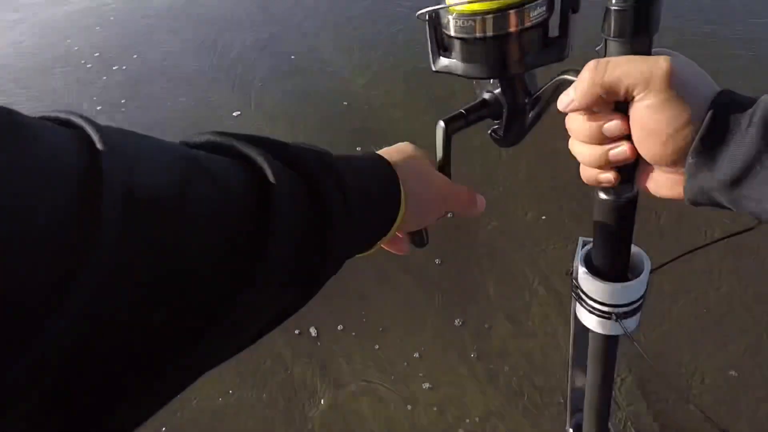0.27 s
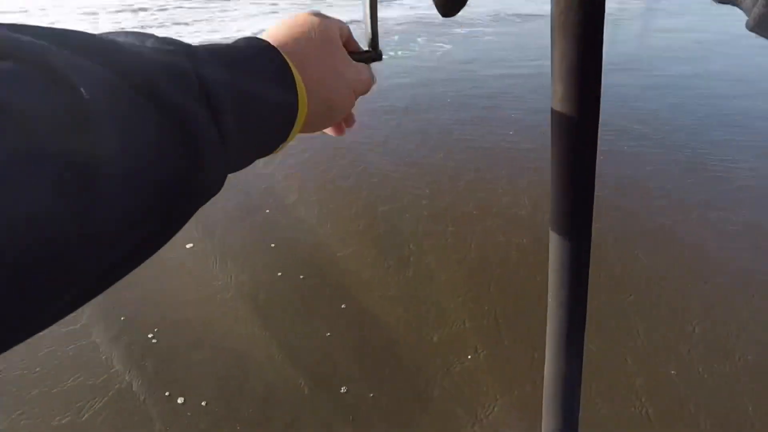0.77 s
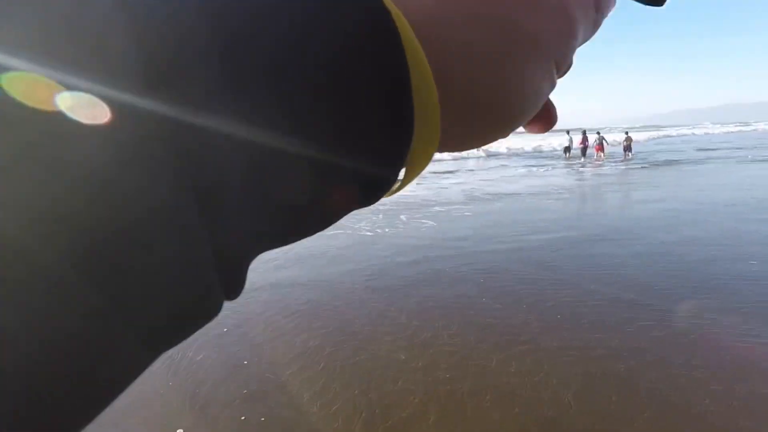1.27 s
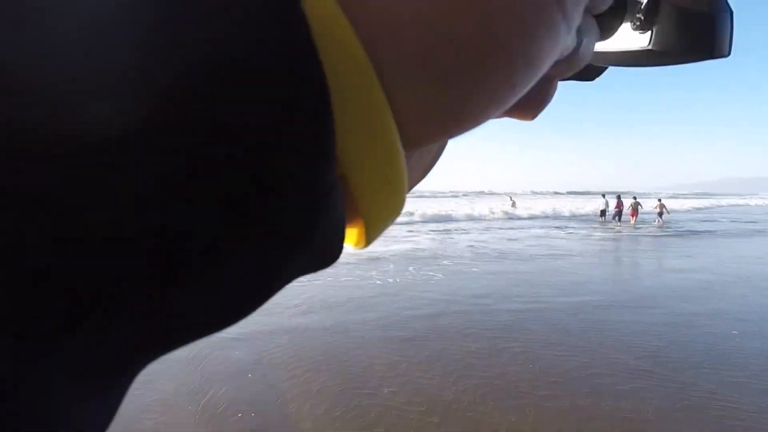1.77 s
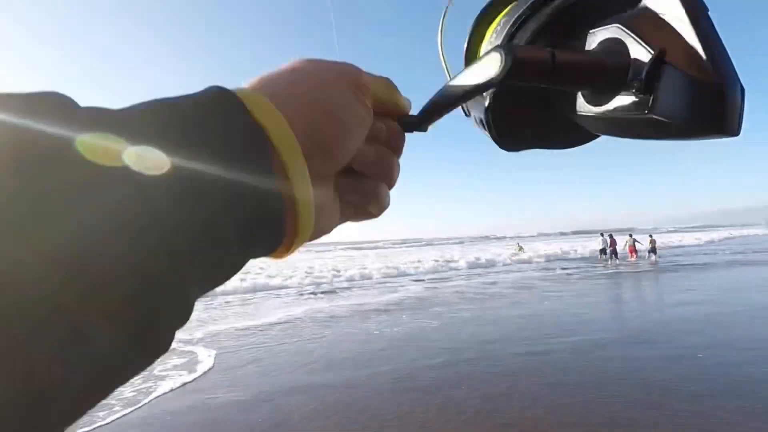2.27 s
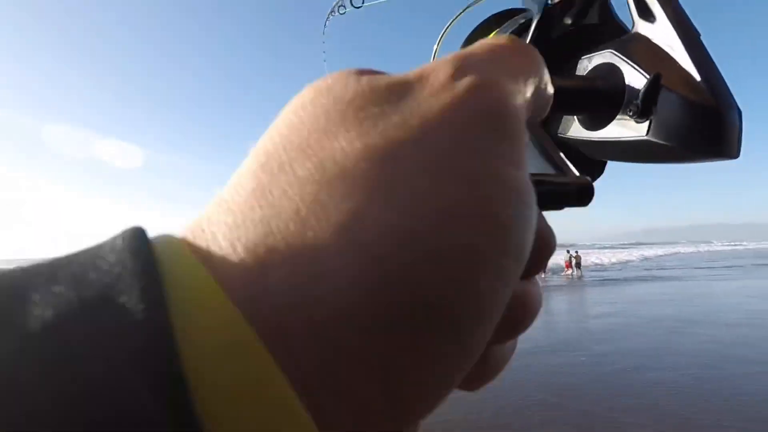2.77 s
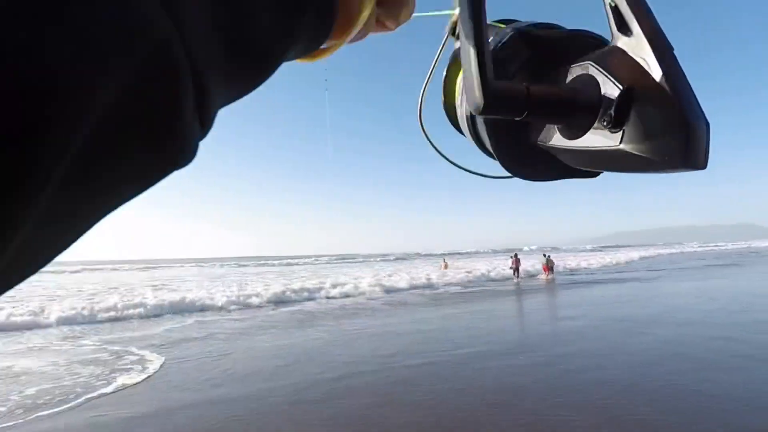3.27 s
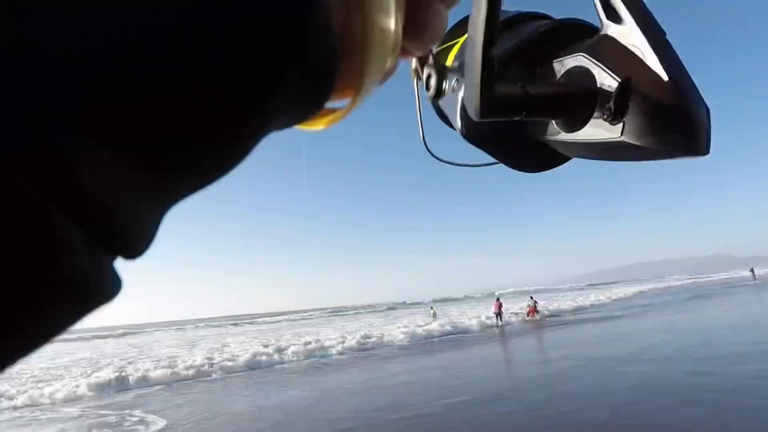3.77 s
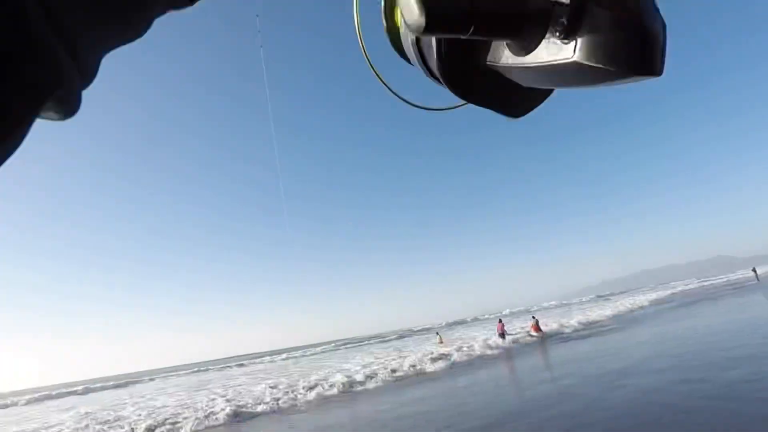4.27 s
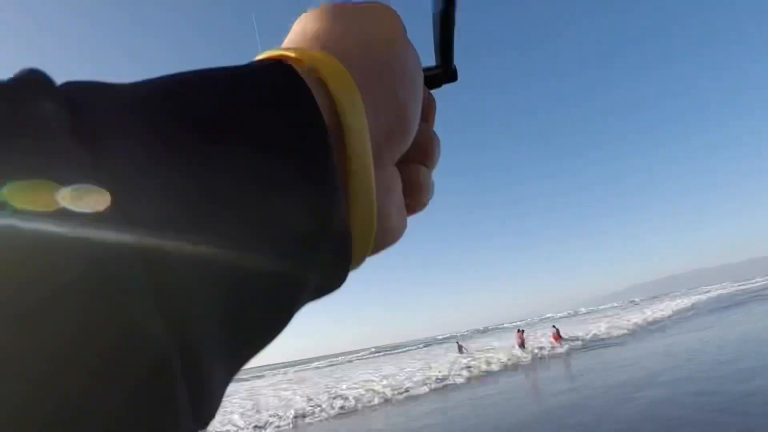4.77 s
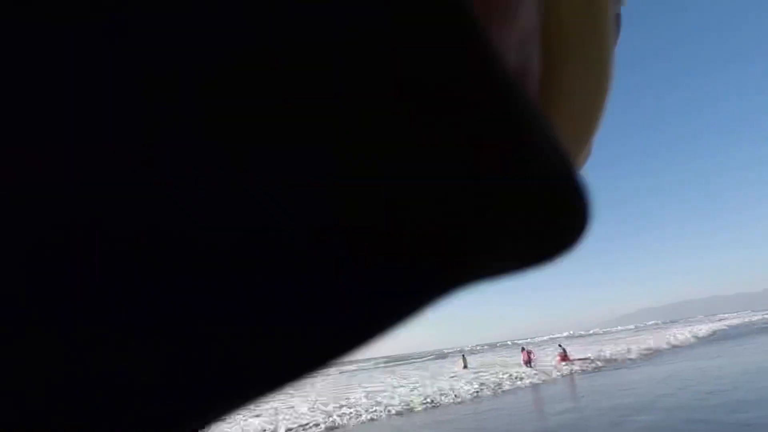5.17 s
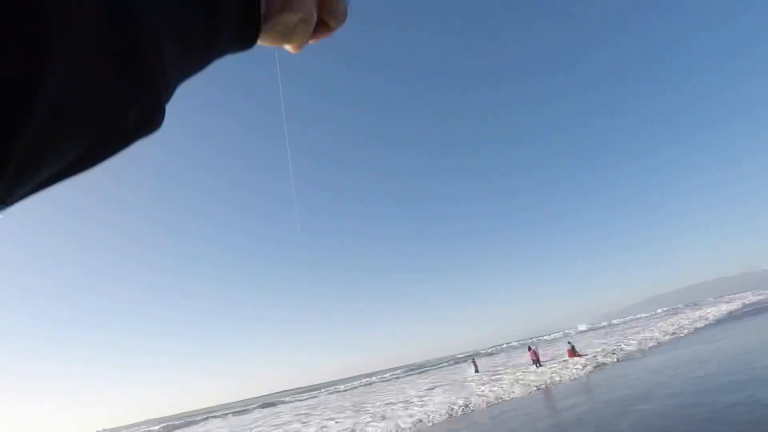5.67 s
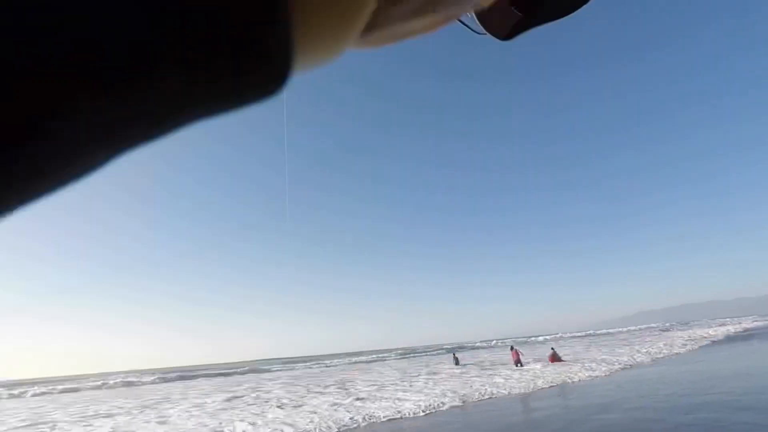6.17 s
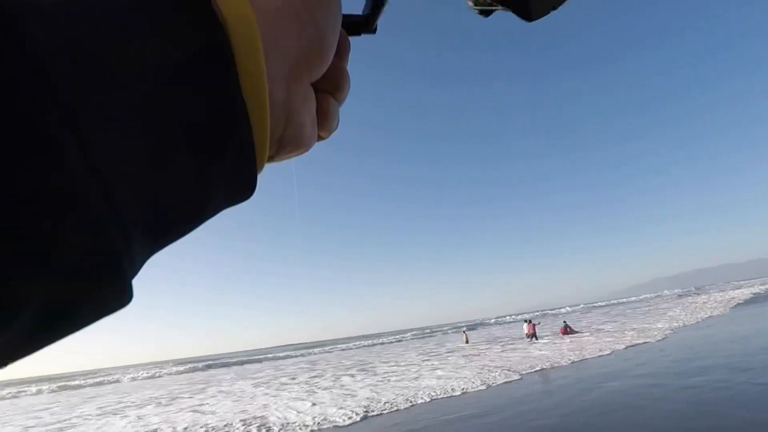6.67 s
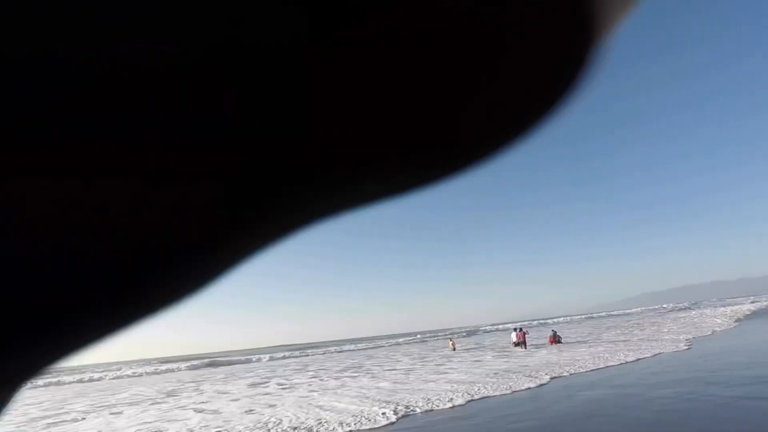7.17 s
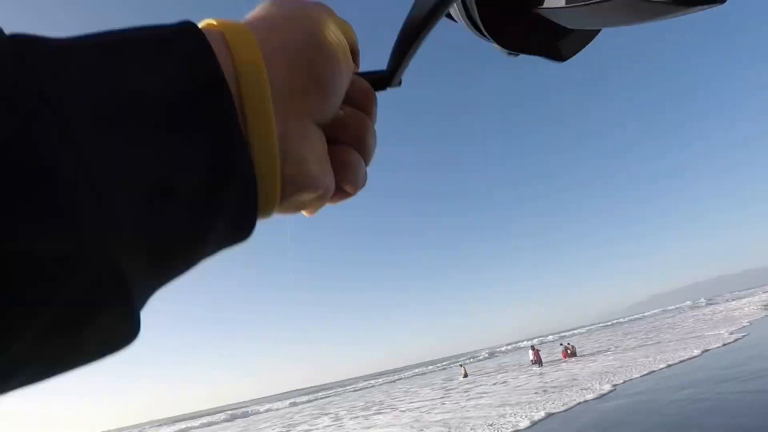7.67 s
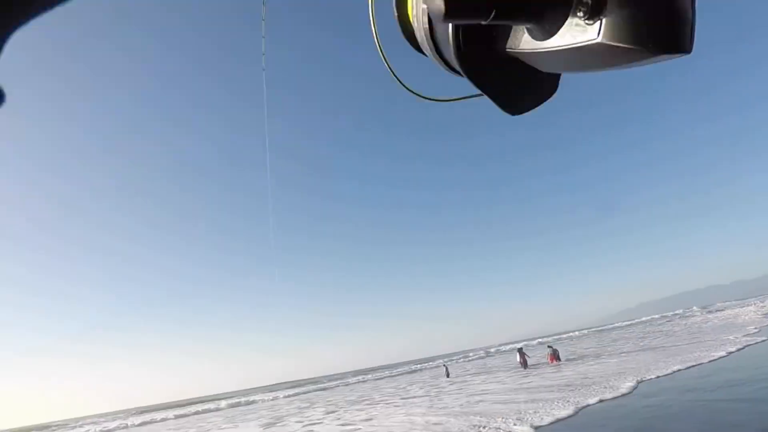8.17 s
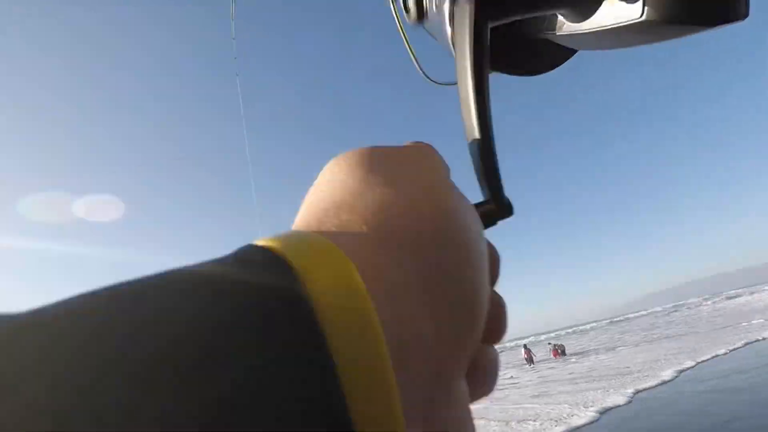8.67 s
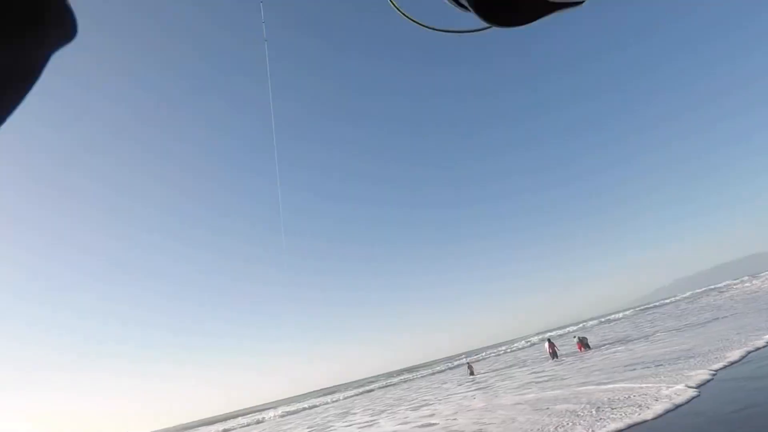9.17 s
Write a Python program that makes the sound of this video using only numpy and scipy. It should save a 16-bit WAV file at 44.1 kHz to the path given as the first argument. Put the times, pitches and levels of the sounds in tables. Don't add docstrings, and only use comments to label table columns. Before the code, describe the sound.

On an open beach, loud deep surf fills the first seconds with a low wind moan and buffets. Close by, a fishing reel begins with separate crisp clicks, then breaks into a steady, rapid metallic chatter with a thin whirr. The surf gradually sinks behind it. Late on, each handle turn gives a dull knock and scraping tick. The body-worn microphone is near the reel, wide and wind-rumbled.

```python
import sys
import numpy as np
from scipy import signal
from scipy.fft import rfft, irfft
from scipy.io import wavfile
from scipy.ndimage import uniform_filter1d, minimum_filter1d

SR = 44100
rng = np.random.default_rng(int(sys.argv[2]) if len(sys.argv) > 2 else 0)


def gain_from_db(level_db):
    decades = np.asarray(level_db, float) / 20
    return 10 ** decades


def persist_wave(psi):
    counts = np.round(np.clip(psi, -1, 1) * 32767).astype(np.int16)
    wavfile.write(sys.argv[1], SR, np.atleast_2d(counts).T)


N = 414540

# (f/Hz, likeness 0-1)
REEL_LIKENESS = [(2000, 0.83), (4500, .9), (6000, .5), (8000, 0.04), (12000, 0.14)]
HAND_SHADE_DB = 4


def evened(x):
    return x / np.sqrt(np.mean(x ** 2) + 1e-20)


def read(points, hz):
    f, value = np.transpose(points)
    return np.interp(np.log(hz + 1), np.log(f + 1), value)


def add(mix, s, sound):
    part = mix[..., round(s * SR):][..., :sound.shape[-1]]
    part += sound[..., :part.shape[-1]]


def ring(t, hz, db, t60):
    return gain_from_db(db - 60 * t / t60) * np.sin(2 * np.pi * hz * t)


def push(t, db, hz):
    turns = np.minimum(hz * t, 1.5)
    return -gain_from_db(db) * np.sin(2 * np.pi * turns) * np.sin(2 * np.pi * turns / 3)


def port_pair(a, b, likeness, hz):
    same = np.clip(read(likeness, hz), 0, 1)
    return np.array([a, same * a + np.sqrt(1 - same ** 2) * b])


def curve(rows, column):
    rows = np.array(rows)
    t = np.arange(N) / SR
    time_left = N / SR if rows[-1, 0] > 9.3 else rows[-1, 0] - t
    edge = np.clip(np.minimum(t - rows[0, 0], time_left) / .15, 0, 1)
    return gain_from_db(np.interp(t, rows[:, 0], rows[:, column])) * edge


def surf():
    # (f/Hz, level/dB per Hz)
    spectrum = [(12, -38), (20, 6.5), (54, -8.5), (106, -0.5), (365, -5), (687, -12), (1040, -18),
                (1330, -25), (2000, -34.5), (3760, -36.5), (4940, -42), (6860, -37.5), (11600, -49.5),
                (12900, -57.5), (14000, -85)]
    # (f/Hz, likeness 0-1)
    surf_likeness = [(25, 0.6), (60, 0.18), (130, 0.74), (290, 0.98), (640, 0.88), (1300, 0.31),
                     (2500, 0.5), (4000, 0.67), (5500, 0.1), (8000, 0.5), (13000, 0.5)]
    # (f/Hz, phase/rad by which left leads)
    port_phase = [(400, 0), (800, 1.4), (1300, 1.6), (2000, 1.2), (2500, 0), (5000, 0), (7000, 2.)]
    # (f/Hz, left-right level/dB)
    port_balance = [(60, 2.5), (150, 2), (380, -2), (950, -1.5), (2380, 4), (5980, -0.5), (15000, 0.5)]
    # (t/s, surge level/dB, left-right level/dB)
    surge = [(0, 1, 0), (.8, 0, -0.5), (1.2, -1, 0.5), (1.4, -2, 0.5), (1.9, -1, -1.5), (2.5, -1.5, -0.5),
             (3.1, -2.5, -1), (4.1, -3.5, -0.5), (4.6, -6, 0), (5.5, -7, -2), (5.9, -8.5, -1.5),
             (7.09, -11, -2.5), (7.9, -10.5, -3), (8.6, -11, -2.5), (9.4, -12, -3)]
    follow = [0.3, 0.98, 1.5, 1.055]
    layer_hz = [45, 130, 350, 650, 850, 1200]
    layer_index = [0, 1, 1, 2, 2, 3]
    swash_s, swash_wide_s, swash_db = 4.86, 1.82, 4

    frames, hz = N // 256 + 5, np.fft.rfftfreq(1024, 1 / SR)
    t = np.arange(frames) * 256 / SR
    patches, a, b, c, d = rng.standard_normal((frames, 513, 5)).transpose(2, 0, 1)
    patches = evened(uniform_filter1d(uniform_filter1d(patches, 14, 0), 10, 1))
    gusts = evened(uniform_filter1d(rng.standard_normal(frames), 12))[:, None]

    s, surge_db, pan_db = np.transpose(surge)
    layer = np.interp(np.log(hz + 1), np.log(layer_hz), layer_index)
    share = np.maximum(1 - abs(layer - np.arange(4)[:, None]), 0)
    layer_db = np.outer(np.interp(t, s, surge_db), follow)
    layer_db[:, -1] += swash_db * np.exp(-((t - swash_s) / swash_wide_s) ** 2)
    swell_db = layer_db @ share

    z = port_pair(a + 1j * b, c + 1j * d, surf_likeness, hz)
    z *= gain_from_db(read(spectrum, hz) + swell_db + 0.78 * patches + gusts * (hz < 150))
    balance_db = read(port_balance, hz) + np.interp(t, s, pan_db)[:, None]
    tilt = gain_from_db(balance_db / 2) * np.exp(.5j * read(port_phase, hz))
    z *= [tilt, 1 / tilt]
    out = signal.istft(z.transpose(0, 2, 1), nperseg=1024, noverlap=768)[1][:, :N]
    return gain_from_db(-9.5) * out / np.std(out[:, :SR])


def wind():
    # (t/s, level/dB, f/Hz)
    moan = [
        (0.9, -24, 66),
        (1.2, -19.5, 67),
        (1.6, -21.5, 68.4),
        (2.1, -24.5, 69.9),
        (2.35, -30, 69.4),
    ]
    # (t/s, level/dB, f/Hz)
    buffets = [
        (1.02, -9.5, 38),
        (3.33, -9.5, 27),
        (8.832, -12, 25),
    ]
    s, _, pitch_hz = np.transpose(moan)
    hz = np.interp(np.arange(N) / SR, s, pitch_hz)
    out = curve(moan, 1) * np.sin(2 * np.pi * np.cumsum(hz) / SR) * np.sqrt(2)
    for s, db, hz in buffets:
        add(out, s, push(np.arange(4000) / SR, db, hz))
    return out * gain_from_db([[3], [-5]])


def teeth():
    # (t/s, peak level/dB,
    # loudest ring f/Hz)
    run_teeth = [(3.293, -14, 3570), (3.3196, -12, 4040), (3.3505, -13, 4480), (3.3799, -13, 4370),
                 (3.4105, -15.5, 5890), (3.4396, -16, 4940), (3.4674, -14, 2920), (3.4974, -13.5, 5700),
                 (3.536, -16, 2960), (3.5813, -17.0, 4200), (3.6351, -14.5, 3590), (3.688, -15, 4240),
                 (3.7381, -13, 4100), (3.7817, -16, 3080), (3.807, -15, 3900), (3.8378, -14.5, 3940),
                 (3.868, -13, 4000), (3.899, -13.5, 4080), (3.9297, -14.5, 3780), (3.9582, -14.5, 4370),
                 (3.984, -19, 4370), (4.0069, -17, 4230), (4.0286, -17, 5670), (4.0505, -14.5, 5880),
                 (4.0764, -16, 3920), (4.1026, -13.5, 3970), (4.1309, -17, 4290), (4.159, -17, 3540),
                 (4.1862, -14.5, 4100), (4.2131, -14, 3650), (4.2387, -14.5, 3490), (4.265, -14.5, 4130),
                 (4.2911, -16, 4010), (4.3157, -16.5, 3850), (4.3406, -16.0, 3660), (4.363, -16, 5890),
                 (4.384, -13, 4900), (4.4042, -18.5, 5800), (4.4245, -14.5, 3760), (4.4474, -18, 3000),
                 (4.4697, -14.5, 4660), (4.493, -15.0, 4100), (4.5164, -21, 3630), (4.5389, -14.5, 4150),
                 (4.56, -14.0, 3660), (4.58, -17.5, 5370), (4.6026, -14.5, 4210), (4.6263, -14, 3670),
                 (4.6511, -19, 3780), (4.676, -16, 3200), (4.6989, -14.5, 5060), (4.721, -16, 5680),
                 (4.7413, -16, 3000),
                 (4.7637, -14, 3700), (4.785, -14.5, 4970), (4.8094, -15, 3050), (4.8347, -12.5, 4200),
              (4.8586, -17.0, 3630), (4.8793, -17, 5500), (4.8989, -13, 3540), (4.917, -14, 5000),
              (4.9366, -18.5, 5670), (4.9574, -15.0, 3650), (4.9807, -16.5, 3490), (5.0071, -16.5, 3270),
              (5.0304, -15, 4900), (5.0524, -16, 4900), (5.0735, -14, 5140), (5.0908, -21, 2990),
              (5.1116, -16, 2980), (5.133, -13.5, 5210), (5.1542, -16.0, 2990), (5.1787, -15, 4040),
              (5.2017, -17, 4190), (5.223, -14, 3720), (5.245, -20, 5460), (5.2657, -14.5, 4190),
              (5.2895, -13.5, 3800), (5.3132, -15, 3760), (5.3392, -14.5, 3700), (5.3626, -16, 5570),
              (5.3833, -16.5, 2950), (5.4023, -17, 3160), (5.422, -16.5, 3580), (5.442, -14.0, 3000),
              (5.4641, -15, 5230), (5.4874, -15, 5600), (5.5089, -16, 3750), (5.5301, -15, 4950),
              (5.5496, -14, 3640), (5.5684, -16.5, 3570), (5.5882, -13.5, 3650), (5.6089, -14, 5400),
              (5.631, -13, 3180), (5.653, -15.0, 5370), (5.6732, -16, 5880), (5.6921, -16, 4950),
              (5.7097, -17, 3210), (5.7272, -19, 3010), (5.746, -18, 5160), (5.767, -14, 3050),
              (5.7887, -15.5, 4070), (5.8103, -16, 3050), (5.831, -15, 5330), (5.8529, -14, 3850),
              (5.8724, -16, 4960),
                 (5.8952, -14, 3600), (5.919, -14, 5320), (5.9444, -15.5, 3700), (5.9696, -16.5, 3520),
              (5.995, -15.5, 4940), (6.017, -15, 2980), (6.0393, -16, 3130), (6.0606, -17, 3590),
              (6.0844, -16, 5160), (6.1086, -15.0, 4130), (6.131, -14.5, 4100), (6.1539, -17.0, 4900),
              (6.173, -13, 3520), (6.1923, -19, 5500), (6.2093, -15, 3430), (6.2268, -16.5, 5550),
              (6.2476, -12.5, 3140), (6.2711, -15, 3790), (6.2962, -16.5, 3550), (6.3193, -15, 5810),
              (6.3392, -15.5, 4920), (6.3574, -17.5, 4820), (6.3766, -17.5, 5120), (6.3967, -17.5, 4940),
              (6.4184, -14.5, 5120), (6.44, -16.5, 4230), (6.4625, -17, 3630), (6.4831, -15.5, 4970),
              (6.5027, -16, 3700), (6.5234, -17.5, 5460), (6.545, -15.5, 3730), (6.5737, -16, 5360),
              (6.6044, -14.5, 3520), (6.6327, -16.0, 3730), (6.6603, -15.5, 3780), (6.6857, -16, 3200),
              (6.7086, -15.5, 3000), (6.732, -17.0, 5030), (6.7575, -15, 3000), (6.786, -18.5, 5400),
              (6.8141, -15, 4200), (6.8394, -18.5, 3730), (6.8597, -14, 4190), (6.8807, -16, 3590),
              (6.8999, -16, 3540), (6.922, -15.0, 3270), (6.9452, -15, 3850), (6.969, -19.5, 3670),
              (6.994, -19, 3200), (7.0157, -17.5, 3760), (7.0356, -17, 5700), (7.0546, -20, 3740),
              (7.0749, -21, 3700),
                 (7.096, -18, 5040), (7.1187, -15.5, 5320), (7.1422, -17.0, 4260), (7.1665, -16.5, 2930),
              (7.1885, -15.5, 5560), (7.209, -16, 5330), (7.2283, -17, 5350), (7.249, -17.0, 5430),
              (7.2701, -16.5, 3450), (7.2924, -21, 3640), (7.314, -17.0, 3590), (7.335, -14.5, 5890),
              (7.3543, -18, 3060), (7.3734, -17, 5070), (7.392, -21, 2950), (7.4123, -13.5, 5090),
              (7.4335, -14.5, 2940), (7.456, -16.5, 3030), (7.4794, -16, 3620), (7.5, -15.0, 4200),
              (7.5218, -13.5, 3760), (7.5429, -14.5, 3500), (7.5642, -15, 3630), (7.586, -17.5, 3470),
              (7.608, -15.5, 3640), (7.6296, -17.5, 2930), (7.6503, -15, 5780), (7.6705, -15, 5810),
              (7.689, -15.5, 5280), (7.7092, -18.0, 5200), (7.7293, -16, 4820), (7.751, -16, 5120),
              (7.7738, -15.5, 4120), (7.7979, -19, 3000), (7.8201, -17.5, 4300), (7.8413, -17, 3830),
              (7.863, -16.0, 3970), (7.8835, -14.5, 3600), (7.9036, -19, 5310), (7.9236, -16, 3750),
              (7.9433, -20, 3000), (7.9625, -20, 5850), (7.9817, -17, 4940), (7.9978, -15, 4950),
              (8.014, -24, 4270), (8.036, -29.5, 5180), (8.0557, -16, 4940), (8.0769, -16, 3990),
              (8.1011, -16, 4190), (8.125, -14, 3630), (8.1474, -16.0, 3570), (8.1674, -19, 4100),
              (8.1878, -15, 4120),
                 (8.2088, -21, 5350), (8.2295, -18.0, 3700), (8.251, -17.5, 3230), (8.271, -18, 5070),
              (8.2908, -18, 3010), (8.3098, -20, 4960), (8.329, -16, 2920), (8.349, -21, 5000),
              (8.3703, -16, 3070), (8.3936, -19.5, 4260), (8.4195, -21.0, 4400), (8.4426, -16.5, 4020),
              (8.4652, -15.5, 3980), (8.4883, -16, 4110), (8.5096, -16.5, 3950), (8.5304, -16, 3490),
              (8.5516, -18.5, 3700), (8.5725, -18.0, 3110), (8.5929, -16.5, 4410), (8.6138, -13.5, 5610),
              (8.6326, -19, 3180), (8.6519, -17, 4480), (8.6749, -15, 3040), (8.6991, -15, 2990),
              (8.7242, -19.5, 5890), (8.7516, -17, 4190), (8.7791, -16, 4950), (8.8026, -17, 4090),
              (8.8233, -17.5, 5890), (8.846, -17.5, 3570), (8.8672, -15, 3710), (8.8911, -14, 3750),
              (8.9132, -17, 3710), (8.9329, -15, 5060), (8.9527, -15.5, 4840), (8.9715, -13, 3180),
              (8.9925, -15, 4270), (9.0127, -23, 4390), (9.0362, -19.5, 5420), (9.0633, -17, 4270),
              (9.0933, -21.5, 4290), (9.1191, -15, 4970), (9.1445, -19, 3590), (9.17, -18.5, 5300),
              (9.2012, -16.5, 5400), (9.2398, -17.5, 4030), (9.2816, -16, 5300), (9.3209, -18.5, 5890),
              (9.3566, -18, 2930), (9.3892, -15, 5650)]
    return np.array(run_teeth)


def facing(tooth):
    facing_tooth, teeth_per_turn = 7.3, 15
    return np.cos(2 * np.pi * (tooth + 1 - facing_tooth) / teeth_per_turn)


def damped(s):
    return -4 / (1 + np.exp(-(s - 7.3) / 0.16))


def click(db, hz, spool_db, rim_db, slow, chance):
    # (f/Hz, level/dB per Hz)
    snap_spectrum = [(1470, -11), (2700, -9), (3660, -5.5), (4310, -4.5), (6250, -5.5), (6920, -3),
                     (8600, -6.5), (11300, -11.5), (13000, -11.5), (16000, -31.5)]
    # (f/Hz, level/dB, t60/s)
    spool_rings = [(7650, -3, .06), (7250, -7, .045), (2300, -16, .04), (3050, -14, .02)]
    pawl_hz = [3000, 3620, 4180, 4950, 5350, 5800]
    t = np.arange(1536) / SR
    f = np.fft.rfftfreq(1536, 1 / SR)
    noise = chance[:3072].reshape(2, -1)
    rebound, other, size, *spots = np.tanh(chance[3072:])

    later = np.maximum(t - .005 - 0.00062 * rebound, 0)
    buzz = gain_from_db(-800 * t) * 0.69 + gain_from_db(-4000 * t) + .5 * (later > 0) * gain_from_db(-3500 * later)
    buzz *= np.minimum(t / .0007, 1) / (1 + (t / .016) ** 8)
    z = port_pair(*rfft(noise), REEL_LIKENESS, f) * gain_from_db(read(snap_spectrum, f))
    top = irfft(z * (f >= 9500)) * gain_from_db(4 * slow - 1.0 - 610 * t)
    body = irfft(z * (f < 9500)) + top

    tooth = ring(t, hz, 1, .024) + ring(later, hz * 1.03, -3, .022)
    for spot in spots:
        spring_hz = pawl_hz[max(int(3 + 3 * spot), 2 * slow)]
        tooth = tooth + ring(t, spring_hz * (1 + .015 * rebound), -7 + 3 * size, .026)
    rim = ring(t, 6700 + 650 * other, rim_db, 0.027) * gain_from_db([[3], [-5]])
    spool = sum(ring(t, mode_hz * (1 + 0.01 * other), level_db + spool_db + 4 * size, t60)
                for mode_hz, level_db, t60 in spool_rings)
    rings = (tooth + rim + spool) * np.minimum(t / 0.00083, 1)
    return gain_from_db(db - 9.5) * (body / np.std(body) * buzz + rings)


def reel():
    # (t/s, peak level/dB, loudest ring f/Hz)
    slow_clicks = [(1.6692, -13.5, 3950), (1.8273, -10.5, 4340), (1.9156, -9, 4500), (1.9715, -10, 4680),
                   (2.0214, -11, 4900), (2.0663, -11, 3820), (2.1097, -11, 3780), (2.1526, -11.5, 4770),
                   (2.196, -12, 4770), (2.2414, -13, 5240), (2.2957, -14, 4100), (2.3162, -16, 6600),
                   (2.3671, -11, 5000), (2.4279, -22, 3600), (2.5083, -12.5, 4270), (2.6589, -12.5, 4350),
                   (2.6869, -24, 3700), (2.7991, -15, 3750), (2.9153, -30, 5220), (2.9358, -16, 3840),
                   (2.9677, -24, 4500), (2.9847, -23.5, 4140), (3.048, -14, 4000), (3.0874, -21, 4000),
                   (3.1194, -13.5, 4120), (3.1792, -17, 4160), (3.2271, -13, 4100), (3.264, -15, 3840)]
    resting_db = -3.5
    rim_shade_db = 4
    out, fast = np.zeros((2, N)), teeth()
    rows = list(slow_clicks) + list(fast)
    seen = np.append(np.zeros(len(slow_clicks)), facing(np.arange(len(fast))))
    chances = rng.standard_normal((len(rows), 3078))
    for (s, db, hz), in_view, chance in zip(rows, seen, chances):
        slow = s < fast[0, 0]
        spool_db = resting_db * slow + HAND_SHADE_DB * in_view + damped(s)
        add(out, s, click(db, hz, spool_db, rim_shade_db * in_view, slow, chance))
    return out


def fuzzy_tone(hz, width):
    f = np.fft.rfftfreq(N, 1 / SR)
    resonance = 1 + (2 * (f - hz) / width) ** 2
    return evened(irfft(rfft(rng.standard_normal(N)) / resonance, N))


def drag():
    # (f/Hz, level/dB per Hz)
    whirr = [(1060, -4.5), (1800, -5), (2690, -5), (3030, -2), (5150, -2.5), (6130, -3), (7560, -1),
             (9860, -4), (11300, -14), (12600, -11), (14200, -10.5), (15400, -14.5), (16000, -72)]
    # (t/s, whirr level/dB)
    drag_level = [
        (3.1, -38),
        (3.25, -35.5),
        (3.6, -39),
        (3.85, -36),
        (4.33, -36.5),
        (5.24, -40.5),
        (6.4, -42),
        (6.93, -40),
        (8.2, -39.5),
        (9.4, -40),
    ]
    # (f/Hz, width/Hz, level/dB over whirr, slope/dB per tooth/s)
    drag_rings = [(7620, 320, -2, -0.24), (2270, 41, -17.5, 1.48), (7030, 270, -21.5, 3),
                  (2990, 110, -7, -0.02), (3700, 150, -18, 1.5)]
    f, t = np.fft.rfftfreq(N, 1 / SR), np.arange(N) / SR
    at = teeth()[:, 0]
    seen = facing(np.interp(t, at, np.arange(len(at))))
    speed = np.interp(t, at[1:], np.clip(1 / np.diff(at), 24, 54)) - 45

    grains = rng.standard_normal((2, N))
    grains = grains * gain_from_db(3.6 * evened(uniform_filter1d(rng.standard_normal(N), 60)))
    rub = irfft(port_pair(*rfft(grains), REEL_LIKENESS, f) * gain_from_db(read(whirr, f)), N)
    out = gain_from_db(8.5 + 0.33 * speed) * evened(rub)
    for hz, width, db, slope in drag_rings:
        ring_db = db + slope * speed
        if hz > 6000:
            ring_db = ring_db + HAND_SHADE_DB * seen + damped(t)
        if hz < 2500:
            ring_db = ring_db + 1.6 * HAND_SHADE_DB * seen
        out = out + gain_from_db(ring_db) * fuzzy_tone(hz, width) * gain_from_db([[2], [-2]])
    return curve(drag_level, 1) * out


def knocks():
    # (t/s, peak level/dB, scrape t60/s)
    ticks = [
        (5.4271, -19, 0.037),
        (6.38, -18, .04),
        (7.065, -16, 0.019),
        (7.385, -18, .03),
        (7.7042, -17, .04),
        (8.0062, -20, .04),
        (8.0202, -12, .03),
        (8.328, -18.5, .08),
        (8.65, -19, 0.098),
        (8.984, -17, 0.057),
    ]
    # (t/s, level/dB, f/Hz)
    thuds = [
        (5.43, -23, 70),
        (6.38, -11, 70),
        (7.069, -12, 76),
        (7.388, -9, 80),
        (7.707, -11, 74),
        (8.013, -4, 47),
        (8.331, -13, 80),
        (8.656, -5.5, 84.5),
        (8.988, -7, 48),
    ]
    # (t/s, peak level/dB, f/Hz)
    taps = [
        (8.9928, -3, 4120),
    ]
    rebound_s, rebound_db = 0.01, -18
    out, t = np.zeros(N), np.arange(4000) / SR

    handle = ring(t, 1590, 0, .017) + ring(t, 1370, -4.5, 0.011)
    handle = handle + ring(t, 1910, -3.5, 0.016) + ring(t, 2100, -13, 0.011)
    handle = handle * np.minimum(t / 0.0017, 1)
    bounce = gain_from_db(rebound_db) * (np.arange(4000) == round(rebound_s * SR))
    for (s, tick_db, t60), noise in zip(ticks, rng.standard_normal((len(ticks), 4000))):
        scrape = 0.064 * noise * gain_from_db(-60 * t / t60) + (t == 0) + bounce
        add(out, s, gain_from_db(tick_db + 5) * signal.oaconvolve(scrape, handle)[:4000])
    for s, db, hz in thuds:
        add(out, s, push(t, db, hz) * gain_from_db(-150 * t))
    for s, db, hz in taps:
        tap = ring(t, hz, db, 0.018) + ring(t, hz * .87, db - 7, 0.016) + ring(t, hz * 1.1, db - 5, 0.016)
        add(out, s, tap * np.minimum(t / 0.0032, 1))
    return out


def gain_control():
    # (t/s, level/dB)
    gain_steps = [
        (7.09, -2),
        (7.41, -2.5),
        (8.043, -6.5),
    ]
    regain_db_per_s = 0.72
    t = np.arange(N) / SR
    return gain_from_db(sum((t > s) * np.minimum(db + regain_db_per_s * (t - s), 0) for s, db in gain_steps))


def thinned(x, floor_db):
    # (f/Hz, level/dB)
    side_needs = [(2000, -30), (2800, -5), (4200, -2), (5800, -5), (6500, -14), (9500, -12), (11300, -1),
                  (14000, 4)]
    f, t, z = signal.stft(np.array([x[0] + x[1], x[0] - x[1]]) / 2, SR, nperseg=1024)
    power = (abs(z[:, :512]) ** 2).reshape(2, 64, 8, -1).mean(2)
    mid_db, side_db = 10 * np.log10(power + 1e-20)
    waver = uniform_filter1d(rng.standard_normal((66, len(t))), size=5, axis=1)
    hz = f[4:512:8, None]

    masked_db = floor_db + .3 * uniform_filter1d(mid_db[0], size=20)
    heard = (mid_db > masked_db + 7 * waver[:64] + 5 * waver[64]) | (hz < 9800)
    heard &= (hz < 15500 + 1300 * waver[64]) | (mid_db > masked_db + 22)
    peak_db = -minimum_filter1d(-mid_db, size=5, axis=1)
    heard &= (mid_db > peak_db - 13 + 5 * waver[:64]) | (hz < 9300)
    wide = side_db - mid_db > read(side_needs, hz) + 4 * waver[:64] + 7 * waver[65]
    z[:, :512] *= np.repeat([heard, heard & wide], 8, axis=1)
    mid, side = signal.istft(z, SR, nperseg=1024)[1][:, :N]
    return np.array([mid + side, mid - side])


def scene():
    return surf() + wind() + reel() + drag() + knocks() * gain_from_db([[-5], [2]])


def low_pass(x):
    return signal.sosfilt(signal.butter(12, 16320, fs=SR, output="sos"), x)


def record(dry):
    f = np.fft.rfftfreq(N, 1 / SR)
    limited = 1.35 * np.tanh(dry * gain_control() / 1.26)
    port_dip_db = -12 / (1 + ((f - 11300) / 250) ** 2)
    ported = irfft(rfft(limited) * gain_from_db(port_dip_db), N)
    mix = np.clip(thinned(ported, floor_db=-76), -1, 1)
    return low_pass(mix)


dry = scene()
out = record(dry)
persist_wave(out)
```